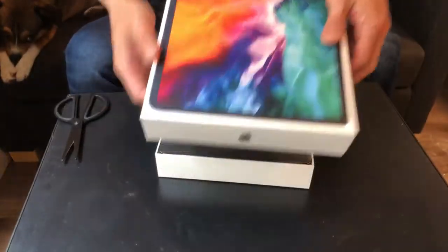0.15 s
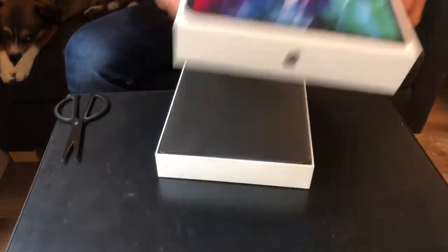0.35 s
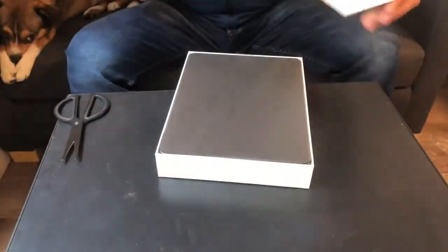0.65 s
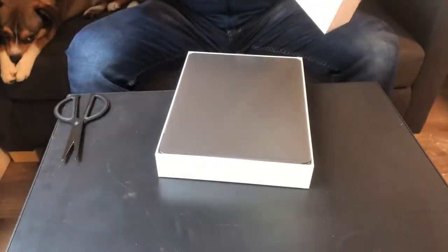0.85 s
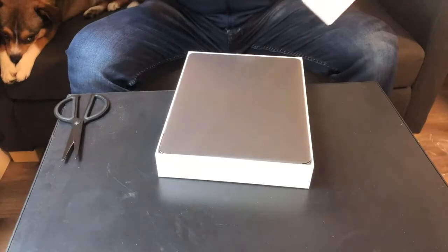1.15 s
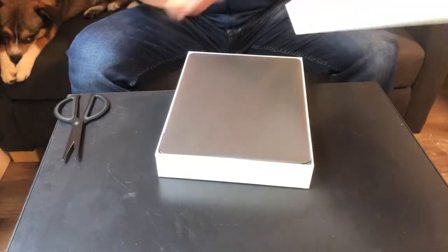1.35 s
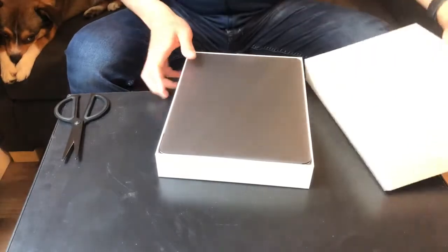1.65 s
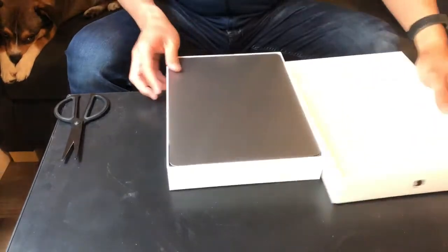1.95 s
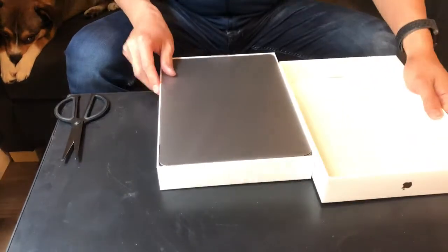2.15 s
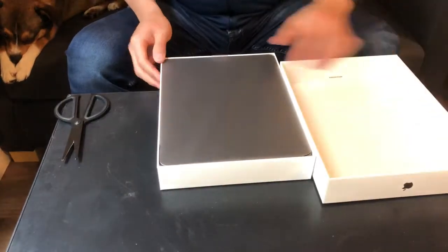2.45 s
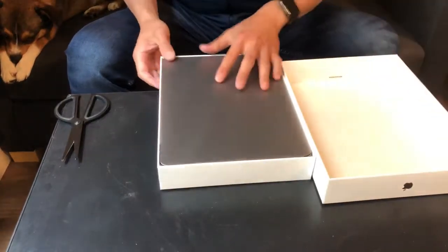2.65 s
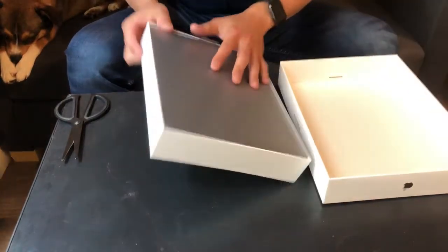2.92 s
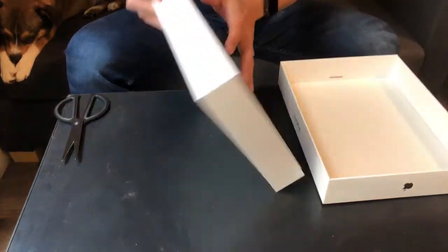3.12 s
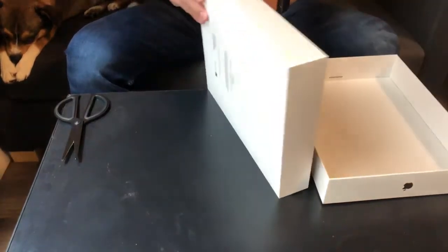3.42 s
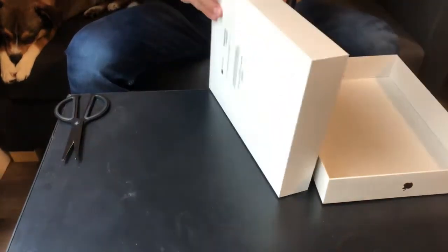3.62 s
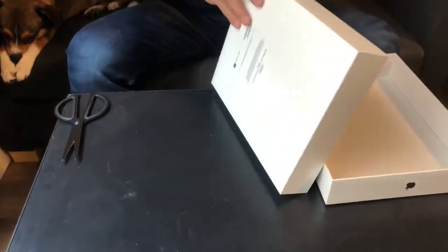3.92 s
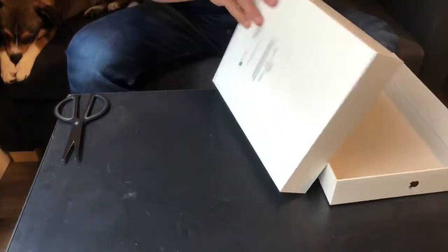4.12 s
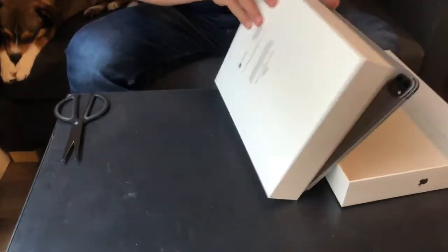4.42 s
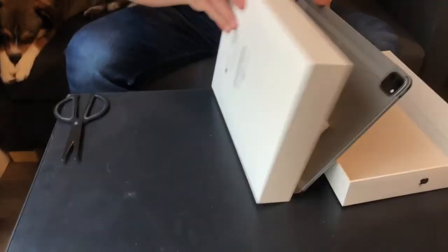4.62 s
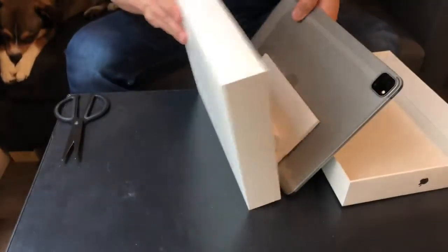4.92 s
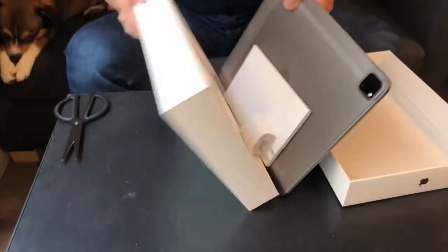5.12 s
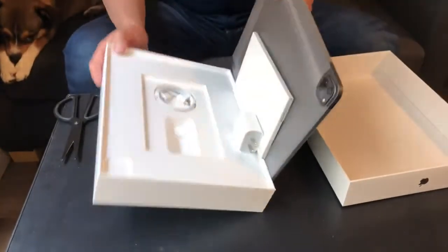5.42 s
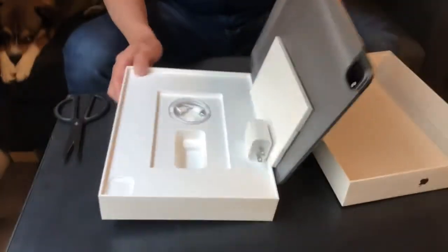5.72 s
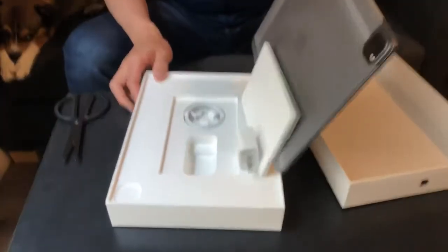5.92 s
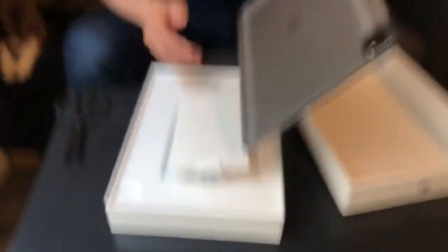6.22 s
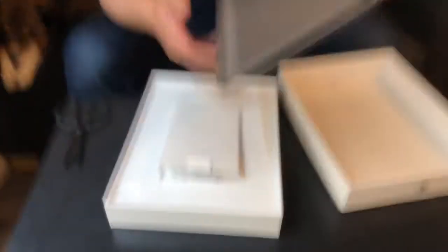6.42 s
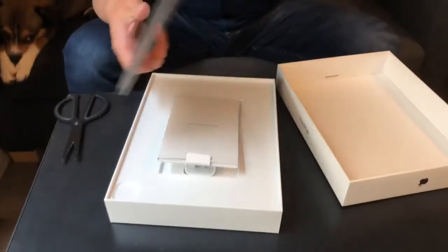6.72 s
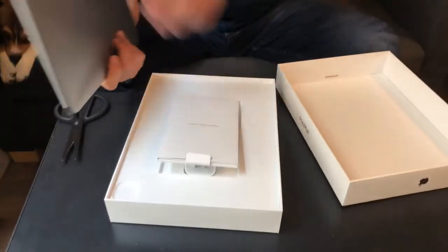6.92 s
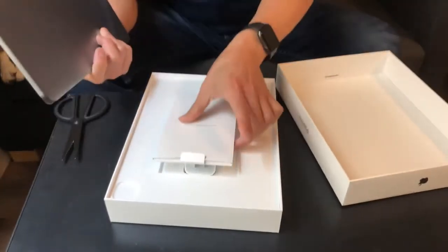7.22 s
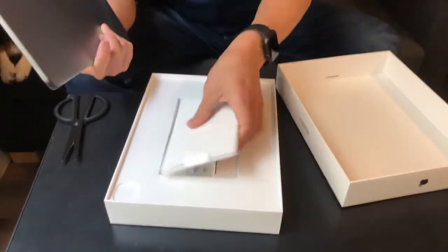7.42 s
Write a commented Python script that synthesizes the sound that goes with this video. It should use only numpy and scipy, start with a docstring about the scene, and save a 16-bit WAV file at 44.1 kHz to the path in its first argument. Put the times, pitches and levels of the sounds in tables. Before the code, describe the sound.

Quiet, sparse cardboard handling at first: short papery rubs, a gentle lid set-down and dry sliding. Halfway through comes the loudest blow, a hard woody smack, followed by denser scraping, brief stick-slip creaks, crisp clicks and hollow knocks on the table with low shudders. Everything is close and dry, with short small-room reflections over soft air noise and a low hum.

```python
"""A stiff cardboard box is opened on a low table in a small, quiet room, with the microphone close.
Over air noise and steady low tones, hands rub the card from the start: filtered friction noise. The lid
is set down and slid aside with light knocks; the tray is tipped up, creaking in runs of slips, and a flat
slab flops out against the lid, with the loudest blow near 4.5 s. The tray creaks, scrapes and knocks back
onto the table: blows shaped by box resonances, amid bright ticks, low shudders and room echoes."""
import sys
import numpy as np
from scipy import signal
from scipy.fft import rfft, irfft, next_fast_len
from scipy.io import wavfile
from scipy.ndimage import uniform_filter1d

SR = 44100
rng = np.random.default_rng(int(sys.argv[2]) if len(sys.argv) > 2 else 0)


def to_wav(s):
    """Save 16-bit WAV."""
    ch = np.atleast_2d(s).T  # columns
    pcm = np.round(np.clip(ch, -1, 1) * 32767)  # PCM
    wavfile.write(sys.argv[1], SR, pcm.astype(np.int16))


N = 333307
TIME = np.arange(N) / SR


def amp(db):
    """Decibels to gain."""
    return 10 ** (np.asarray(db) / 20)


def unit(x):
    """Scales to rms 1."""
    return x / np.sqrt(np.mean(x ** 2) + 1e-20)


def read(points, hz):
    """Reads a table on a log-frequency axis."""
    f, value = np.transpose(points)
    return np.interp(np.log(hz + 1), np.log(f + 1), value)


def add(mix, s, sound):
    """Mixes a sound in at time s."""
    part = mix[max(round(s * SR), 0):][:len(sound)]
    part += sound[:len(part)]


def ringing(hz, spread_db=3.5):
    """Response of the box: the plain blow plus its modes, at random weights for where it is touched."""
    # what table, box and slab ring with: (frequency [Hz], level over the plain blow [dB], t60 [s])
    modes = [(80.5, 7.5, 0.55), (137, 8.5, 0.13), (215, -16, 0.33), (320, -10, 0.48), (528, -6, .13),
             (633.4, -4, .22), (737, -10, 0.19), (857, 0.5, .22), (963, -9.5, 0.31), (1012, -6, 0.25),
             (1220, -7, .2), (1697, -3.5, 0.07), (1706, -7, .2), (1836, -9, 0.36), (2130, 0, 0.23),
             (2265, -7.5, 0.23), (2470, -7.5, .16)]
    weights = amp(spread_db * rng.standard_normal(len(modes)))
    response = 1
    for weight, (f, db, t60) in zip(weights, modes):
        decay_s = t60 / np.log(1000)
        response = response + weight * amp(db) / (1 + 2j * np.pi * (hz - f) * decay_s)
    return response


def coloured(x, points, body=False):
    """Gives x a spectrum, and the resonances of the box if asked; rms 1."""
    size = next_fast_len(len(x))
    hz = np.fft.rfftfreq(size, 1 / SR)
    response = amp(read(points, hz)) * (ringing(hz) if body else 1)
    return unit(irfft(rfft(x, size) * response, size)[:len(x)])


def bounces(decay_s, size):
    """Spectrum of a brief, dying flurry of reflections, of energy 1."""
    t = np.arange(size) / SR
    envelope = np.exp(-t / decay_s) - np.exp(-4 * t / decay_s)
    flurry = rng.standard_normal(size) * envelope
    return rfft(flurry / np.linalg.norm(flurry))


def room_tone(air_db=-65.0):
    """Low, steady room noise from coloured noise, with three steady low tones under it."""
    # the quiet air of the place: (frequency [Hz], relative density [dB per Hz])
    air_colour = [(18, -32), (30, -14), (50, -6.5), (125, -2.5), (175, -4.5), (236, -3.5), (384, -12),
                  (734, -16.5), (1440, -20.5), (2610, -25), (8830, -32.5), (15000, -41.5)]
    # steady low tones under the air noise: (frequency [Hz], rms level [dB])
    low_tones = [(80.7, -74.5), (119.6, -67), (217, -78)]
    tones = np.zeros(N)
    for hz, db in low_tones:
        tones += amp(db) * np.sqrt(2) * np.sin(2 * np.pi * (hz * TIME + rng.random()))
    return tones + amp(air_db) * coloured(rng.standard_normal(N), air_colour)


def room(x, wet_db, gap_s):
    """Dense reflections of a furnished room: sparse echoes that start after a gap and die at a rate per pitch."""
    # how long the room rings: (frequency [Hz], t60 [s])
    decay_times = [(100, 0.51), (300, 0.38), (900, 0.43), (2500, 0.54), (6000, 0.36), (14000, 0.15)]
    echo_colour = [(120, 4.5), (380, -2.5), (900, 3.0), (2500, 0.0), (6000, 4), (14000, 1.5)]  # (Hz, dB)
    t, out = TIME[:SR * 2 // 3], np.zeros(N)
    for k in range(3):
        hits = rng.random(len(t)) < 2500 / SR
        taps = rng.choice([-1., 1.], len(t)) * hits * np.clip(t / gap_s - 1, 0, 1)
        hz, frame_s, z = signal.stft(taps, SR, nperseg=256)
        colour_db = read(echo_colour, hz)[:, None]
        fall_db = 60 * frame_s / read(decay_times, hz)[:, None]
        tail = signal.istft(z * amp(colour_db - fall_db), SR, nperseg=256)[1]
        # the box moves about, so three echo patterns take turns
        share = np.sqrt(2 / 3) * np.cos(np.pi * (TIME + k / 3))
        out += signal.fftconvolve(x * share, tail / np.linalg.norm(tail))[:N]
    return amp(wet_db) * out


def stroke(length, fastest):
    """The hand speeds up and slows down in one arch; friction follows a power of its speed."""
    speed_power = 0.93
    through = np.linspace(0, 1, int(length * SR))
    turn = np.clip(fastest, .05, .95)
    speed = abs(np.sin(np.pi * np.interp(through, [0, turn, 1], [0, .5, 1])))
    return speed ** speed_power


def fibres(per_s, spread_db, smooth, flutter_db):
    """Friction: fibres catch and snap over a smooth sliding noise, under uneven pressure."""
    force = amp(spread_db * np.minimum(rng.exponential(1, N), 4))
    catches = (rng.random(N) < per_s / SR) * force * rng.choice([-1, 1], N)
    slow_noise = uniform_filter1d(rng.standard_normal(N), size=500)
    pressure = unit(uniform_filter1d(slow_noise, size=300))
    return (unit(catches) + smooth * rng.standard_normal(N)) * amp(flutter_db * pressure)


def wander(x, scatter=0.58, scatter_s=0.01, size=8192):
    """The contact moves over the card, so the echoes from the walls keep changing its colour."""
    out, window = np.zeros(N), np.sin(np.pi * np.arange(size) / size)
    padded = np.pad(x, (0, size))
    for start in range(0, N, size // 2):
        walls = (1 + scatter * bounces(scatter_s, 2 * size)) / np.hypot(1, scatter)
        piece = padded[start:start + size] * window ** 2
        add(out, start / SR, irfft(rfft(piece, 2 * size) * walls))
    return out


def rubbing(drag_db=-3.5, rasp_db=-6.0, hiss_db=-5.0):
    """Sliding card drones in the box, rasps in its walls and hisses at the contact; strokes add in power."""
    # strokes of card over table, card or skin: (start [s], length [s], fastest point [share of length],
    # drag [dB], rasp [dB], hiss [dB]), each level before the layer's own trim
    strokes = [(0, 0.084, 0.33, -59, -61, -79), (0.109, 0.097, 0.56, -57.5, -66, -69),
               (0.424, 0.33, 0.3, -68.5, -68, -77), (1.028, 0.096, .5, -66, -81, -69),
               (1.112, 0.42, 0.11, -72, -65.5, -70.5), (1.57, 0.3, 0.42, -53.5, -61, -69),
               (1.784, 0.22, 0.63, -59, -54, -57.5), (1.942, 0.23, 0.42, -52, -54, -64),
               (2.18, 0.12, 0.31, -68, -65, -73), (2.487, 0.28, 0.97, -58.5, -65.5, -73),
               (2.608, 0.063, 0.27, -62, -58, -61), (2.732, 0.32, 0.49, -58.5, -57.5, -58),
               (2.849, .33, 0.55, -45, -48, -60), (3.056, 0.29, 0.45, -57.5, -53.5, -65),
               (3.55, 0.2, 0.7, -66, -66, -80), (3.833, 0.14, 0.39, -52, -59.5, -69.5),
               (4.112, 0.15, 0.21, -52.5, -55.5, -72), (4.192, 0.46, 0.27, -45, -49.5, -62.5),
               (4.53, 0.32, 0.31, -48.5, -52, -61), (4.754, 0.26, 0.31, -48, -49, -61.5),
               (4.95, 0.39, 0.54, -48, -48.5, -64.5), (5.255, 0.19, 0.44, -44.5, -45, -54.5),
               (5.378, 0.39, 0.63, -50, -55, -59), (5.691, 0.21, 0.63, -44.5, -47.5, -53.5),
               (5.864, 0.15, 0.44, -47, -50.5, -54.5), (5.962, .15, 0.27, -47, -49.5, -58.5),
               (6.254, .15, 0.33, -44, -56, -61), (6.499, .39, .3, -66.5, -70.5, -73),
               (7.1, 0.13, 0.95, -50.5, -47, -64.5), (7.24, 0.15, 0.21, -48, -48, -73),
               (7.361, 0.18, 0.19, -43.5, -53.5, -57)]
    # colours of the three layers: (frequency [Hz], level [dB])
    drag_colour = [(50, -12), (130, -9.5), (215, 9), (310, -0.5), (450, 3), (620, -15.5), (1000, -29),
                   (3000, -62)]
    rasp_colour = [(200, -40.5), (500, -4.5), (750, 0.5), (1400, 1.5), (2300, -3), (3200, -13.5),
                   (6000, -40.5)]
    hiss_colour = [(1200, -38.5), (2300, -4.5), (3100, 1), (4800, 0.5), (7000, -6.5), (10000, -13.5),
                   (15500, -31)]
    power = np.zeros((3, N))
    for start, length, fastest, *levels_db in strokes:
        for layer, db in zip(power, levels_db):
            add(layer, start, (amp(db) * stroke(length, fastest)) ** 2)
    drive = wander(fibres(per_s=3000, spread_db=3, smooth=1.0, flutter_db=1.57))
    trims_db, colours = [drag_db, rasp_db, hiss_db], [drag_colour, rasp_colour, hiss_colour]
    out = np.zeros(N)
    for level, db, colour in zip(np.sqrt(power), trims_db, colours):
        out += level * amp(db) * coloured(drive, colour, body=True)
    return out


def scuffs(soft_hz=6500):
    """An edge or a finger skids briefly: a burst of friction around one pitch."""
    # short scuffs: (time [s], length [s], level [dB], centre [Hz], width [octaves])
    skids = [(0.13, 0.071, -77, 8350, 0.49), (0.531, 0.025, -67, 1390, 0.9),
             (1.069, 0.013, -57.5, 990, 0.82), (1.16, 0.29, -79, 9500, 0.83),
             (1.148, 0.065, -60, 1220, 0.44), (1.657, 0.034, -61.5, 3280, 0.94),
             (1.819, 0.023, -49.5, 400, 0.6), (2.235, .055, -79, 11000, .5), (2.62, 0.043, -77, 10000, .6),
             (2.717, 0.14, -64.5, 2360, 0.51), (4.126, 0.039, -57, 1950, 0.49),
             (4.238, 0.03, -47.5, 1250, 0.5), (4.417, 0.15, -71, 13000, 0.38),
             (4.471, 0.026, -51.5, 2960, 1.9), (4.673, 0.0059, -38, 1090, 0.4),
             (5.14, 0.024, -47.5, 3860, 0.61), (5.151, 0.046, -46, 2820, 0.46),
             (5.294, 0.041, -49.5, 905, 0.44), (5.616, 0.4, -70.5, 10400, 0.73),
             (6.007, 0.055, -69, 11100, 0.74), (6.107, 0.041, -49.5, 2650, 0.52),
             (6.391, 0.0085, -56.5, 3500, 0.88), (6.6, 0.29, -78, 10360, 0.81),
             (7.107, 0.0083, -55, 1100, 1.0), (7.165, 0.032, -46.5, 2580, 0.7),
             (7.254, 0.042, -49, 2390, 0.95), (7.385, 0.17, -77, 11000, .6)]
    out, drive = np.zeros(N), wander(fibres(per_s=1700, spread_db=5.0, smooth=.7, flutter_db=1.8))
    hz = np.geomspace(50, 16000, 30)
    for s, length, db, centre_hz, octaves in skids:
        burst = drive[int(s * SR):][:int(length * SR)]
        hump = 1 + (np.log2(hz / centre_hz) / octaves) ** 2
        softening = 1 + (hz / max(soft_hz, centre_hz)) ** 2
        hump_db = -20 * np.log10(hump * softening)
        add(out, s, amp(db) * coloured(burst, np.c_[hz, hump_db]) * signal.windows.tukey(len(burst), .5))
    return out


def blow(levels_db, colour, panel_hz, panel_db=7, panel_octaves=0.25, scatter=.5, scatter_s=0.0095,
         crush_hz=2000, size=16384):
    """One blow on the box, its energy trimmed towards a level (dB over 10 ms) in each of four bands."""
    # the range of thump, body, clack and tick: (low [Hz], high [Hz])
    bands = [(80, 220), (250, 600), (700, 2500), (3000, 9000)]
    crush, crush_s = .7, .0009  # the card crushes at the contact: share of the treble 0-1, decay s
    hz = np.fft.rfftfreq(size, 1 / SR)
    # the struck panel lifts the spectrum around its own pitch
    panel_distance = np.log2((hz + 1) / panel_hz) / panel_octaves
    shape_db = read(colour, hz) + panel_db / (1 + panel_distance ** 2)
    # the bass is one clean push; the treble is partly the ragged crushing of the card
    ragged = crush * hz ** 2 / (hz ** 2 + crush_hz ** 2)
    contact = np.sqrt(1 - ragged) + np.sqrt(ragged) * bounces(crush_s, size)
    body = ringing(hz) * (contact + scatter * bounces(scatter_s, size))
    power = abs(body * amp(shape_db)) ** 2 * 2 / size / (SR / 100)
    trims = []
    for db, (lo, hi) in zip(levels_db, bands):
        band_power = power[(hz > lo) & (hz < hi)].sum()
        trims.append((np.sqrt(lo * hi), db - 10 * np.log10(band_power)))
    # fold the cepstrum, so that the colour does not sound before the contact
    cepstrum = irfft(np.log(amp(shape_db + read(trims, hz))))
    cepstrum[1:size // 2] *= 2
    cepstrum[size // 2 + 1:] = 0
    # bending waves: the treble arrives first, the bass some milliseconds later
    lag_s = .014 / (1 + (hz / 180) ** 1.5)
    chirp = np.exp(-2j * np.pi * np.cumsum(lag_s) * SR / size)
    return irfft(np.exp(rfft(cepstrum)) * body * chirp)[:size // 2]


def knocks():
    """Lid, tray and slab strike the table and each other: heavy blows thump, hard ones clack and tick."""
    # blows: (time [s], box body level [dB], weight = thump over body [dB], hardness = clack over body [dB],
    # pitch of the struck panel [Hz])
    strikes = [(0.906, -84, 0, 21.5, 300), (0.988, -58.5, -15, 1, 420), (1.056, -66.5, -8, 5, 493),
               (1.163, -62, -11, 7, 520), (1.1691, -57.5, 6, 10.5, 557), (1.598, -62, 10, 6, 350),
               (1.6568, -37.5, -0.5, -13, 520), (1.674, -47, -6, -25, 300), (1.7159, -48.5, 2, -8.5, 486),
               (1.739, -60.5, 17, -2, 460), (1.8192, -45, -1, -16, 313), (1.951, -54, 7, -0.5, 510),
               (2.236, -55.5, 0, -0.5, 650), (3.513, -58, 7, -9.5, 282), (3.8403, -47, -14, -11.5, 398),
               (3.915, -44.5, -17, -7, 412), (4.267, -40, -8, -20, 430), (4.289, -38.5, -4, -24, 310),
               (4.4857, -23, -13.5, -5.5, 470), (4.488, -15.5, -16.5, 0, 497), (4.4976, -44, -12, 3, 446),
               (4.6724, -27, -21, -20.5, 304), (4.743, -44.5, -8, -20, 460), (4.785, -45.5, 7, -6, 420),
               (5.383, -47.5, 6.5, -20, 337), (5.6039, -22.5, -9, -9.5, 446),
               (5.6095, -32.5, -3, -10.5, 360), (5.8453, -25.5, -26, -13, 297.4),
               (5.8515, -28, -6.5, -24.5, 311), (5.944, -30, -15, -4, 343),
               (6.1317, -25, -13.5, -14.5, 407), (6.139, -25.5, -12.5, -6.5, 378),
               (6.167, -41, 1, -18, 380), (6.181, -26, -1, 4.5, 307), (6.19, -31, -20, -14, 625),
               (6.2023, -21.5, -28, -13.5, 393), (6.2049, -18, -15.5, -6, 343),
               (6.3037, -39, -20, 7.5, 360), (6.329, -31.5, -8.5, -11, 360), (6.343, -26.5, -13, -22, 326),
               (6.3501, -40.5, -6, 10.5, 380), (6.3997, -21, -6, -12.5, 389), (6.412, -27, -24, -23.5, 362),
               (6.435, -24, -23.5, -16, 353), (6.74, -71.5, 9, 8.5, 330), (7.116, -35.5, -24, -14, 450),
               (7.224, -61, -11, 15, 330), (7.2801, -27.5, -34, -18, 370), (7.286, -31.5, 0.5, -5.5, 296),
               (7.3838, -38.5, -16, -5, 298), (7.4217, -29, -10, -8.5, 358)]
    # colour of a blow on card: (frequency [Hz], level [dB])
    blow_colour = [(25, -30), (70, -12.5), (135, -8), (210, -2.5), (380, 0.5), (650, -6), (1050, -5),
                   (2000, -14), (3500, -22), (6000, -33.5), (10000, -47), (16000, -65)]
    # the edge tick lies this far under the body, and gains this share of the hardness
    tick_under_db, tick_share = 18.5, 0.86
    hard_tilt = .06  # a harder blow reaches higher: dB per octave for each dB of hardness
    out, (hz, colour_db) = np.zeros(N), np.transpose(blow_colour)
    for s, body_db, weight_db, hard_db, panel_hz in strikes:
        tick_db = tick_share * hard_db - tick_under_db
        levels_db = body_db + np.array([weight_db, 0, hard_db, tick_db])
        octaves_above = np.log2(np.maximum(hz / panel_hz, 1))
        colour = np.c_[hz, colour_db + hard_tilt * hard_db * octaves_above]
        add(out, s, blow(levels_db, colour, panel_hz))
    return out


def bright_ticks(panel_hz=420):
    """The sharp treble edge of some knocks, and a few separate clicks: small blows with a strong tick band."""
    # ticks: (time [s], tick level [dB], brightness [dB per octave])
    ticks = [(1.659, -61, 4), (1.741, -64, -4), (2.082, -63.5, 8), (4.308, -62.5, -6), (4.351, -60, -2),
             (5.118, -50, 1), (5.146, -47.5, -1.5), (5.157, -49, -5), (5.175, -56, 3), (5.187, -58, 7),
             (5.328, -49, -9.5), (6.138, -50, -4.5), (6.1813, -48, -7), (6.2037, -40.5, 1.5),
             (6.331, -55, -4), (6.3491, -46.5, -3), (7.269, -44.5, 0), (7.28, -57, 3)]
    # the lower bands over the tick: (thump [dB], body [dB], clack [dB])
    rest_db = (-4.5, -5.5, 1)
    # colour of a tick: (frequency [Hz], level [dB])
    tick_colour = [(25, -36.5), (130, -9), (400, -8), (1200, -4), (3500, -3), (6000, -13), (10000, -27.5),
                   (16000, -41.5)]
    out, (hz, colour_db) = np.zeros(N), np.transpose(tick_colour)
    for s, tick_db, tilt_db in ticks:
        colour = np.c_[hz, colour_db + tilt_db * np.log2(hz / panel_hz)]
        levels_db = [tick_db + db for db in rest_db] + [tick_db]
        add(out, s, blow(levels_db, colour, panel_hz, scatter=.35, scatter_s=.006))
    return out


def creaks(jitter=0.046, slip_db=-4, thump_db=-22, spread_db=2.0):
    """Card sticks and slips: a run of nearly even slips, each a tiny blow on the box."""
    # runs: (time [s], length [s], slips [per s], body [dB], clack [dB], tick [dB], panel pitch [Hz]),
    # levels before the slip trim and its random force
    runs = [(2.537, .025, 255, -59, -73, -74, 510), (2.61, .05, 244, -60, -66.5, -80, 513),
            (2.687, .035, 244, -59, -85, -86, 480), (4.252, .018, 260, -42.5, -49.5, -66, 654),
            (4.834, 0.018, 218, -36.5, -50, -58, 446), (4.88, .011, 205, -35, -54, -58, 620),
            (4.9, 0.035, 200, -39, -48.5, -62, 443), (5.458, .022, 300, -42.5, -54, -68, 447),
            (5.484, .016, 310, -45, -55, -80, 620), (5.516, 0.02, 380, -45, -47, -81, 910)]
    # colour of one slip in a corner of the tray: (frequency [Hz], level [dB])
    slip_colour = [(100, -23), (280, -2.5), (435, -2.5), (640, -4.5), (900, -9.5), (1350, -9), (2000, -27),
                   (2900, -15), (4200, -28), (8000, -58), (16000, -70)]
    out = np.zeros(N)
    for s, length, rate, body_db, clack_db, tick_db, panel_hz in runs:
        levels_db = [body_db + thump_db, body_db, clack_db, tick_db]
        slip = blow(levels_db, slip_colour, panel_hz, panel_db=8, scatter=0.46, scatter_s=0.0069)
        chance = rng.standard_normal(size=(64, 2))
        for k, (late, force) in enumerate(chance[:int(length * rate) + 1]):
            add(out, s + (k + jitter * late) / rate, slip * amp(slip_db + spread_db * force))
    return out


def shudder(rise_s=.012):
    """The table sways low after each shove: low noise that swells fast and dies away."""
    # shoves: (time [s], level before rise and decay [dB], t60 [s])
    pushes = [(3.53, -52, 0.36), (4.495, -56, 0.97), (5.61, -52, 0.99), (6.185, -42, 0.4),
              (6.405, -42, 0.43), (7.285, -59, 0.66)]
    # colour of the sway: (frequency [Hz], level [dB])
    sway_colour = [(20, -35.5), (30, -13), (38, 2.5), (47, 5.5), (63, 1.5), (82, -6.5), (110, -5),
                   (200, -60)]
    sway, t = np.zeros(N), TIME[:SR]
    for s, db, t60 in pushes:
        add(sway, s, amp(db - 60 * t / t60) * (1 - np.exp(-t / rise_s)))
    return sway * coloured(rng.standard_normal(N), sway_colour)


def scene():
    """All the handling, its reflections, the shuddering table and the room itself."""
    handling = knocks() + bright_ticks() + creaks() + rubbing() + scuffs()
    echoes = room(handling, wet_db=-12.5, gap_s=0.0076)
    return (handling + echoes + shudder() + room_tone())[None]


def record(dry):
    """The recorder's band limit: a steep low-pass."""
    edge_hz = 15800
    low_pass = signal.firwin(511, edge_hz, window=("kaiser", 9), fs=SR)
    return signal.oaconvolve(dry, low_pass[None], "same")


dry = scene()
out = record(dry)
to_wav(out)
```